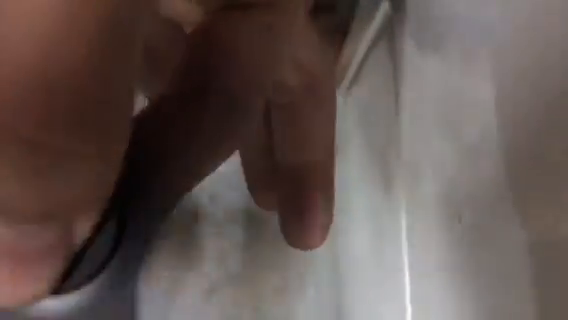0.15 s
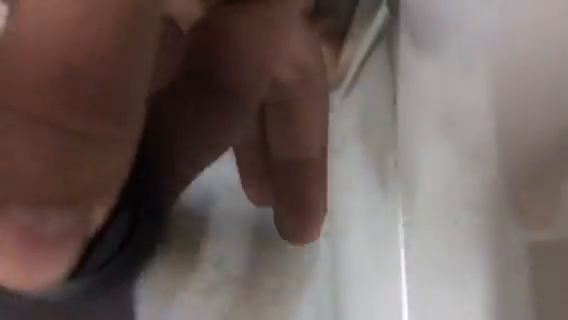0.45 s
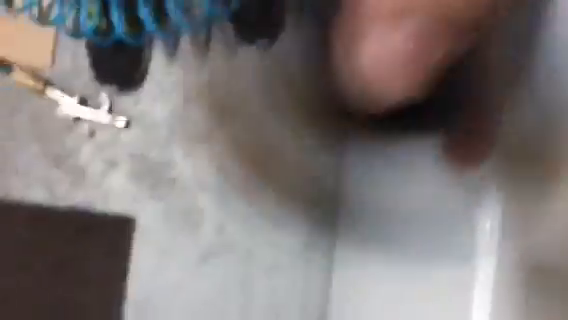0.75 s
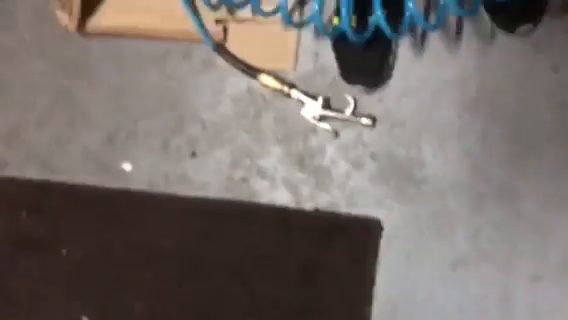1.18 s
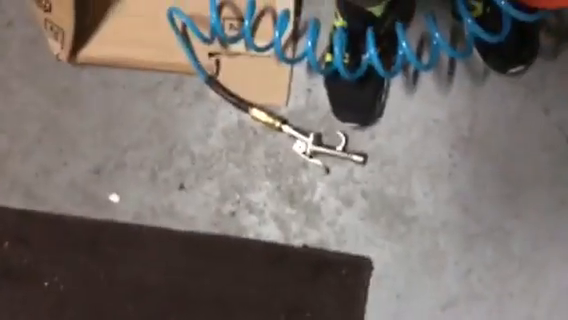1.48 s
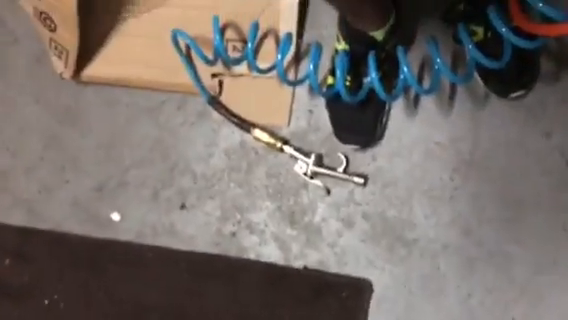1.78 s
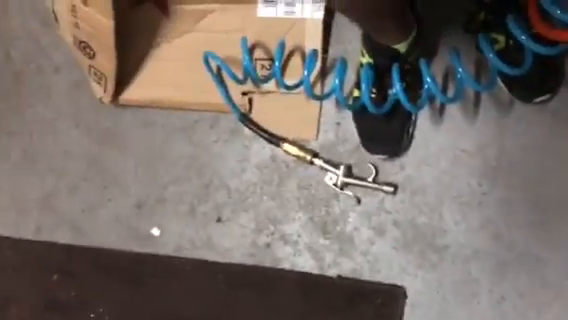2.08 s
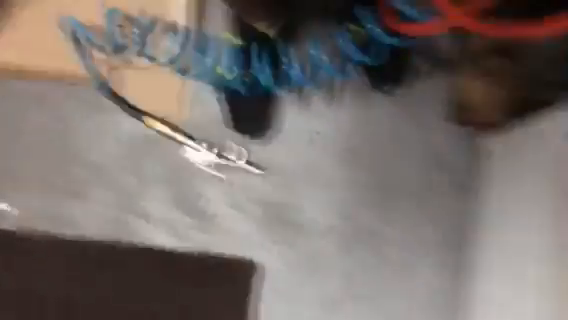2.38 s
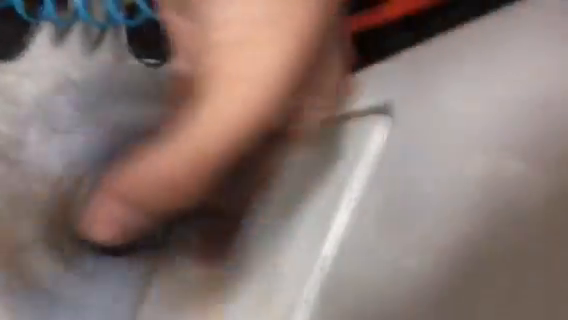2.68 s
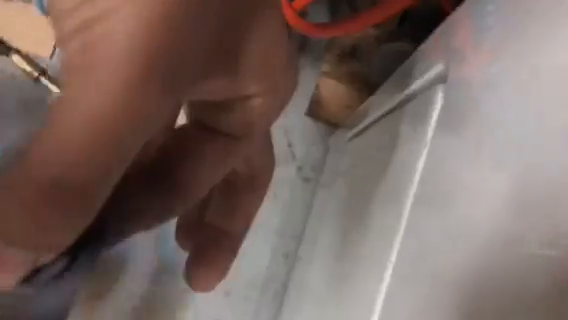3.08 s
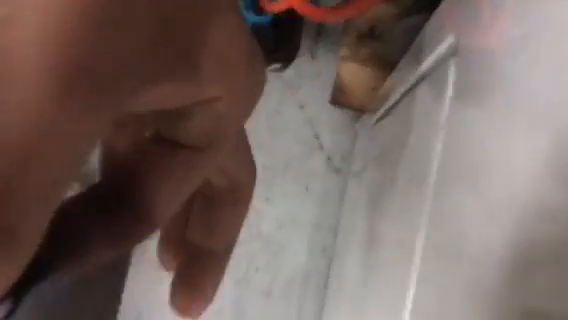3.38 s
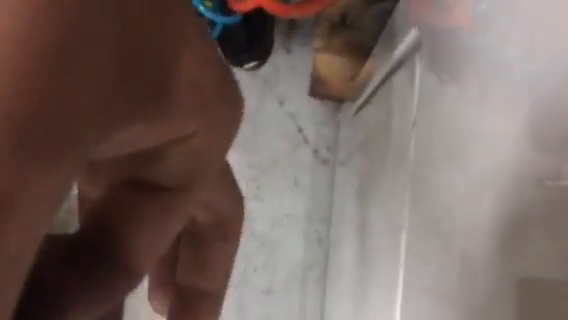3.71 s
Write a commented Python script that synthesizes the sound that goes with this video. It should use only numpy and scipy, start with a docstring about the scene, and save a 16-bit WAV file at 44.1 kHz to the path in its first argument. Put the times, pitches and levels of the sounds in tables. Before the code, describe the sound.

A fidget spinner coasts down, close to a phone microphone in a quiet workshop. Until about 0.9 s a wavering low hum near 150 Hz, sinking slowly, mixes with rushing air, hissy bearing rattle and sharp ticks. From 1.1 to 2.4 s it is faint and distant, then returns unevenly, softer. At 3.39 s a hard knock bounces with a short clattering tail; faint scraping and grip rumble follow around 3.6 s as whirring continues.

```python
"""Hand spinner coasting down

A three-lobed hand spinner coasts down after a blast of air, held close to the microphone, away, and close again.
Its lobes hum at their passing rate and throw lumpy air: sines, narrow-band noise and a broad rush.
The ball bearing rattles: bursts of noise and single clicks set resonances of the race ringing.
Late on something hard knocks, bounces and briefly scrapes in a quiet workshop: clicks drive decaying modes
and a grainy tail."""
import sys
import numpy as np
from scipy import signal
from scipy.io import wavfile

SR = 44100
rng = np.random.default_rng(int(sys.argv[2]) if len(sys.argv) > 2 else 0)


def wrap_up_sound(samples):
    """Save the sound to the file named by the first command line argument, as 16-bit audio."""
    columns = np.atleast_2d(samples).T
    # keep every value between -1 and 1, then stretch to whole-number steps
    tamed = np.clip(columns, -1, 1)
    steps = np.round(tamed * 32767).astype(np.int16)
    wavfile.write(sys.argv[1], SR, steps)


def invert_db(level):
    """Linear amplitude ratio for a level in decibels (20 dB per decade), elementwise."""
    return 10 ** (np.asarray(level, dtype=float) / 20)


N = 169785
LOBES = 3

# contacts of the knock, its bounces and a short soft scrape near 3.59 s:
# (time [s], height of the click [dB], contact sharpness [Hz])
CONTACTS = [(3.3865, -18.5, 5260), (3.3869, -19.5, 9100), (3.3882, -10, 10000), (3.3905, -10, 650),
            (3.4025, -34, 2030), (3.417, -31, 696), (3.4603, -40, 3500), (3.4628, -27.5, 1290),
            (3.4664, -33.5, 2480), (3.4713, -44, 600), (3.557, -38.5, 900), (3.586, -49, 2500),
            (3.594, -40, 4000), (3.602, -45, 3000), (3.613, -35, 600), (3.635, -38.5, 596),
            (3.679, -40, 406)]


def rms_one(x):
    """Normalization: scale to an rms of 1."""
    return x / np.sqrt(np.mean(np.abs(x) ** 2) + 1e-20)


def in_time(rows):
    """Linear interpolation: the table's columns after the first as curves, one value a sample."""
    seconds, *columns = np.transpose(rows)
    return [np.interp(np.arange(N) / SR, seconds, column) for column in columns]


def drift(rate_hz):
    """Low-pass random process: noise twice through a one-pole filter, with a spread of 1."""
    pole = np.exp(-2 * np.pi * rate_hz / SR)
    slow = signal.lfilter([1], [1, -2 * pole, pole * pole], rng.standard_normal(N + SR))
    return rms_one(slow[SR:])   # without the first second, where the filter settles


def band_pass(x, low_hz, high_hz):
    """Butterworth band-pass: maximally flat between its edges."""
    edges = [low_hz, min(high_hz, .45 * SR)]
    return signal.sosfilt(signal.butter(2, edges, "band", fs=SR, output="sos"), x)


def ring(clicks, hz, t60):
    """Damped oscillator: a unit click sets a sine of height 1 ringing, down 60 dB after t60 seconds."""
    pole, angle = invert_db(-60 / (t60 * SR)), 2 * np.pi * hz / SR
    return signal.lfilter([0, np.sin(angle)], [1, -2 * pole * np.cos(angle), pole * pole], clicks + 1e-18)


def coloured(spectrum, patchy_db, patch_hz):
    """Subtractive synthesis: half-octave noise bands, each with its own level and flicker; rms 1."""
    out, together = 0, drift(patch_hz)
    edges = 30 * 2 ** np.arange(0, 9.6, .5)
    white = rng.standard_normal((2, N))   # neighbouring bands draw on different noise
    table_hz, table_db = np.transpose(spectrum)
    for k, (low, high) in enumerate(zip(edges, np.minimum(edges[1:], .45 * SR))):
        level_db = np.interp(np.log(low * high) / 2, np.log(table_hz), table_db)
        flicker_db = patchy_db * (0.18 * together + drift(patch_hz))
        out = out + band_pass(white[k % 2], low, high) * invert_db(level_db + flicker_db)
    return rms_one(out)


def workshop_air():
    """Stationary background noise: broadband sound whose bands flicker slowly."""
    # spectrum of the room: (frequency [Hz], relative density [dB per Hz])
    air_colour = [(21, -50), (35, -4.5), (85, 9.5), (135, -7), (162, -32), (203, -47), (269, -52),
                  (564, -19.5), (2670, -26), (6510, -25.5), (15500, -71)]
    return invert_db(-60) * coloured(air_colour, patchy_db=2.5, patch_hz=3.8)


def handling():
    """Friction noise: as the fingers shift their grip, low band-passed noise swells in lumps."""
    # rumble of the grip: (time [s], level [dB])
    grip_levels = [(3.5, -89), (3.545, -62), (3.56, -53), (3.575, -68), (3.6, -55), (3.625, -55),
                   (3.65, -63), (3.68, -52), (3.72, -61.5), (3.8, -68)]
    lumpy_db = in_time(grip_levels)[0] + 1.5 * drift(38.0)
    return invert_db(lumpy_db) * rms_one(band_pass(rng.standard_normal(N), 44.7, 430))


def knock():
    """Modal excitation: each contact is a rounded click that sets the modes of the struck body ringing."""
    # modes of the struck body: (frequency [Hz], level [dB], t60 [s])
    modes = [(103, -12.5, 0.069), (184, -8.5, 0.018), (417, -3.5, 0.031), (830, 0.5, 0.012),
             (893, -1, 0.017), (1320, -17, 0.032), (1760, -14.5, 0.023), (2490, -10, 0.0089),
             (3600, -6, 0.0028), (4204, -28, .045), (4390, -26, .045), (6500, -8.5, 0.0015),
             (9200, -10.5, 0.0019), (13500, -7.5, 0.0024)]
    contact_span = 35   # a contact drives from sharpness / span up to its sharpness
    force = np.zeros(N)
    for start_s, height_db, sharp_hz in CONTACTS:
        click = np.zeros(N) + 1e-18
        click[int(start_s * SR)] = invert_db(height_db)
        force += band_pass(click, sharp_hz / contact_span, sharp_hz)
    out = np.zeros(N)
    for k, (hz, level_db, t60) in enumerate(modes):
        out += invert_db(level_db) * (-1) ** k * ring(force, hz, t60)   # modes alternate in sign
    return out


def clatter():
    """Frequency-dependent decay: a grainy tail follows each contact and dies band by band."""
    # bands of the tail: (centre [Hz], relative level [dB], t60 [s])
    tail_bands = [(350, -4, .2), (600, -2, .25), (900, 1, .3), (1350, 1, .28), (1900, -1, .24),
                  (2600, -7, .14), (3600, -8, .08), (4500, -8, .07)]
    clatter_db, grains_per_s = -41.5, 3300
    out, t = np.zeros(N), np.arange(N) / SR
    for hz, level_db, t60 in tail_bands:
        grains = (rng.random(N) < grains_per_s / SR) * rng.standard_normal(N)
        tail = np.zeros(N)
        for start_s, height_db, sharp_hz in CONTACTS:
            decay_db = height_db - 60 * np.maximum(t - start_s, 0) / t60
            # a blunt contact drives the treble less
            tail += invert_db(decay_db) * (t > start_s) / np.hypot(1, hz / sharp_hz)
        grainy = rms_one(band_pass(grains, hz / 1.216, hz * 1.176))
        out += invert_db(clatter_db + level_db) * tail * grainy
    return out


def rush():
    """Turbulence: the stirred air gives broad noise with flickering bands."""
    # strength of the rush: (time [s], level [dB])
    rush_levels = [(0, -43.5), (.2, -43.5), (.4, -43.5), (.5, -43.5), (.75, -44), (.85, -47), (.95, -50),
                   (1.05, -57), (1.3, -60), (2.4, -60.5), (2.55, -55), (2.7, -53.5), (3.2, -54.5),
                   (3.5, -49.5), (3.7, -50), (3.85, -52)]
    # spectrum of the rush: (frequency [Hz], relative density [dB per Hz])
    rush_colour = [(21, -55), (35, -13.5), (60, -4.5), (146, -3), (214, -16), (290, -10), (509, -24.5),
                   (1000, -24.5), (2200, -33.5), (3500, -39), (6000, -63), (16000, -68)]
    return invert_db(in_time(rush_levels)[0]) * coloured(rush_colour, patchy_db=2.0, patch_hz=28.0)


def ball_impacts(phase):
    """Periodic impacts: balls tick near set angles of each turn, with chance in timing and size."""
    slots_per_turn, jitter_slots, tick_chance = 6, .3, .9
    clump_db, spread_db = 1.8, 2.6
    turns = phase / (2 * np.pi * LOBES)
    slot = np.floor(turns * slots_per_turn + jitter_slots * drift(150.0))
    entered = np.diff(np.maximum.accumulate(slot), prepend=0) > 0
    born = entered & (rng.random(N) < tick_chance)
    size_db = clump_db * drift(40.0) + spread_db * np.minimum(rng.exponential(1, N), 2.5)
    return born * invert_db(size_db)


def rattle(phase):
    """Resonant filtering: short noise bursts at the impacts, over a hiss, excite the rings of the race."""
    # which rings carry changes as the hand turns:
    # (time [s], low rings [dB], middle rings [dB], main rings [dB], top rings [dB])
    ring_levels = [(0, -65, -63, -53, -59), (.03, -65.5, -58, -54, -55.5), (.35, -70, -57, -55, -59),
                   (.55, -71, -57, -53, -59), (.65, -69, -59.5, -55.5, -59), (.76, -70, -54, -51.5, -58.5),
                   (.83, -62, -56, -64, -57.5), (.89, -61, -56, -51, -58), (.98, -67, -60.5, -64.5, -62.5),
                   (1.13, -64, -64, -64.5, -65.5), (1.22, -70.5, -69, -68.5, -67),
                   (1.67, -75.5, -73.5, -73.5, -71), (2.0, -75.5, -66, -75.5, -68),
                   (2.34, -71.5, -70, -67.5, -68), (2.42, -67.5, -63, -65, -63.5),
                   (2.55, -66.5, -61.5, -64.5, -61.5), (2.69, -66, -63.5, -62, -61.5),
                   (2.79, -69, -60.5, -65.5, -63.5), (2.85, -66.5, -66.5, -60.5, -68),
                   (2.99, -70.5, -63.5, -68.5, -63.5), (3.31, -72, -60, -61.5, -62),
                   (3.4, -59, -61, -60.5, -62.5), (3.5, -73, -59.5, -57, -64),
                   (3.58, -63.5, -60, -66, -63.5), (3.68, -65, -59.5, -59.5, -63),
                   (3.799, -66.5, -60.5, -65, -63.5), (3.85, -70, -60, -55, -64)]
    # rings of the race in four groups:
    # (frequency [Hz], width of each filter stage [Hz], relative level [dB], hiss over burst rms [dB])
    race = [
        [(4553, 1650, -1, -1)],
        [(6460, 2100, 5, -4.5), (7150, 490, -1.5, 8)],
        [(8100, 980, -1.5, -2.5), (9330, 1600, -10.5, -11)],
        [(11400, 2500, -4.5, -4), (13600, 8400, 6.5, 7), (15600, 2000, 1, 7)],
    ]
    # swell of the ticks once a turn: one value a ring group [dB]
    turn_accents = [5.0, 2.3, 1.3, 2.6]
    ring_spread_db = 2.0   # each ring takes a tick with its own strength
    fade = np.exp(-1 / (.0003 * SR))   # bursts fade with a time constant of 0.3 ms
    impacts, out = ball_impacts(phase), np.zeros(N)
    for level_db, group, accent_db in zip(in_time(ring_levels), race, turn_accents):
        rings = 0
        for hz, width_hz, db, hiss_db in group:
            strength_db = accent_db * np.cos(phase / LOBES) + ring_spread_db * rng.standard_normal(N)
            bursts = rms_one(signal.lfilter([1], [1, -fade], impacts * invert_db(strength_db)))
            drive = (bursts + invert_db(hiss_db)) * rng.standard_normal(N)
            pole, angle = np.exp(-np.pi * width_hz / SR), 2 * np.pi * hz / SR
            # the zeros weaken both ends of the spectrum; the resonator is passed twice
            stage = [0.96, 0.016, -0.74, 1, -2 * pole * np.cos(angle), pole * pole]
            rings = rings + invert_db(db) * rms_one(signal.sosfilt([stage] * 2, drive))
        out += invert_db(level_db) * rms_one(rings)
    return out


def loud_ticks():
    """Impulse response: each loud tick of the bearing is a broad snap and one quickly damped ring."""
    # loud single ticks: (time [s], height before the band-pass [dB], frequency [Hz])
    ticks = [(0.0293, -41, 8340), (0.084, -31, 8000), (0.1905, -30.5, 7760), (0.241, -36, 7380),
             (0.3193, -31.5, 8000), (0.4354, -48, 7800), (0.476, -32, 7920), (0.4988, -53, 8200),
             (0.5144, -27.5, 7940), (0.5694, -28.5, 8500), (0.605, -36, 8100), (0.6456, -34, 7950),
             (0.6833, -37, 7770), (0.7045, -32, 8080), (0.7098, -34, 8100), (0.7634, -29, 7960),
             (0.8052, -35.5, 7290), (0.885, -39, 8060), (1.0136, -49, 7120), (1.056, -42, 7240),
             (2.4074, -38, 7900), (2.4542, -41, 7280), (2.5356, -39.5, 4540), (2.575, -44, 7040),
             (2.6728, -36, 8000), (2.7188, -36, 8100), (2.744, -41, 6910), (2.7621, -39, 7270),
             (2.8712, -36.5, 8100), (2.9166, -42, 7930), (2.953, -48, 7240), (2.999, -39, 7000),
             (3.0445, -38, 7050), (3.067, -54, 6790), (3.1424, -38.5, 7100), (3.256, -40, 8100),
             (3.2715, -37, 7180), (3.2999, -48, 7960), (3.3174, -36, 8160), (3.6164, -39, 7100),
             (3.666, -37, 7840), (3.6814, -44, 7640)]
    t60_s, snap_db = .0025, -2.0
    out, click = np.zeros(N), np.eye(1, 800)[0]
    for start_s, height_db, hz in ticks:
        i = int(start_s * SR)
        tick = ring(click, hz, t60_s) + invert_db(snap_db) * click
        out[i:i + 800] += invert_db(height_db) * band_pass(tick, 4200, 16000)
    return out


def lobe_phase():
    """Drag deceleration: lobe rate = start / (1 + drag * time), summed to a phase in radians."""
    start_hz, drag_per_s = 150.7, .064
    rate_hz = start_hz / (1 + drag_per_s * np.arange(N) / SR)
    return 2 * np.pi * np.cumsum(rate_hz) / SR


def lobes(phase):
    """Blade-passing tone: hum at the lobe rate, with eddies that shake its pitch and add a wavering band."""
    # hum, swelling and sinking as the air is stirred: (time [s], rms level [dB])
    hum_levels = [(0.0, -37), (0.03, -41.5), (0.05, -31), (0.11, -48.5), (0.14, -33), (0.18, -33),
                  (0.21, -38.5), (0.26, -33), (0.29, -30.5), (0.33, -63), (0.36, -31), (0.44, -44.5),
                  (0.52, -44.5), (0.58, -32.5), (0.6, -47.5), (0.62, -32), (0.65, -40), (0.71, -39.5),
                  (0.73, -33.5), (0.84, -45), (0.88, -40), (0.91, -37.5), (1.0, -45), (1.68, -47),
                  (1.69, -49.5), (2.18, -48), (2.43, -50.5), (2.5, -44.5), (2.67, -59.5), (2.7, -42),
                  (2.74, -49.5), (2.77, -40.5), (2.8, -53), (2.82, -39.5), (2.85, -55), (2.87, -38.5),
                  (2.92, -55), (2.96, -37.5), (3.0, -49.5), (3.09, -40), (3.21, -46), (3.24, -38.5),
                  (3.28, -42.5), (3.34, -37), (3.38, -45), (3.4, -45), (3.44, -47), (3.47, -34.5),
                  (3.51, -60), (3.53, -45), (3.65, -46), (3.7, -40.5), (3.72, -48), (3.75, -36.5),
                  (3.78, -47), (3.82, -36.5), (3.85, -44)]
    # second harmonic of the hum: (time [s], rms level [dB])
    octave_levels = [(0, -53), (.15, -45.5), (.3, -48), (.45, -55), (.52, -57), (.6, -52), (.72, -50.5),
                     (.95, -65.5), (1.1, -65), (1.6, -62.5), (2.3, -65), (2.5, -61.5), (2.65, -65.5),
                     (2.95, -60.5), (3.2, -55), (3.35, -56), (3.5, -57.5), (3.7, -59.5), (3.85, -48.5)]
    # lumpy air off the lobes, around the lobe rate: (time [s], rms level [dB])
    wake_levels = [(0, -50), (.3, -50), (.5, -49), (.75, -50), (.95, -55), (1.1, -64), (2.4, -59),
                   (2.65, -62), (2.72, -59), (3.0, -58), (3.3, -56), (3.6, -55), (3.85, -54)]
    waver_rad, waver_at_db, waver_hz = 0.43, -50, 19   # spread of the phase at this wake level, and its rate
    eddy_hz, above, second_db = 18.3, 1.04, -14   # eddies lie 4 % above the lobe rate and its double
    wake_db = in_time(wake_levels)[0]
    shaken = phase + waver_rad * invert_db((wake_db - waver_at_db) / 2) * drift(waver_hz)
    fundamental = invert_db(in_time(hum_levels)[0]) * np.sin(shaken)
    octave = invert_db(in_time(octave_levels)[0]) * np.sin(2 * shaken + 1)
    eddies = []
    for k in (1, 2):
        carrier = k * above * phase
        eddies.append(drift(eddy_hz) * np.cos(carrier) + drift(eddy_hz) * np.sin(carrier))
    wake = invert_db(wake_db) * (eddies[0] + invert_db(second_db) * eddies[1])
    return np.sqrt(2) * (fundamental + octave) + wake


def scene():
    """Superposition: workshop air, grip, struck body and spinner add up; one phase drives lobes and bearing."""
    phase = lobe_phase()
    background = workshop_air() + handling()
    struck = knock() + clatter()
    spinner = rush() + rattle(phase) + loud_ticks() + lobes(phase)
    return (background + struck + spinner)[None]


def band_limit(x):
    """A steep low-pass at the top of the band."""
    return signal.sosfilt(signal.butter(12, 17040, fs=SR, output="sos"), x)


def record(dry):
    """Band limitation: a phone microphone cuts the bass below 38 Hz and the top towards 16.1 kHz."""
    bass_cut = signal.butter(6, 38, "high", fs=SR, output="sos")
    top_cut = signal.cheby2(12, 40, 16100, fs=SR, output="sos")   # 40 dB down from 16.1 kHz
    mix = signal.sosfilt(np.vstack([bass_cut, top_cut]), dry)
    return band_limit(mix)


dry = scene()
out = record(dry)
wrap_up_sound(out)
```